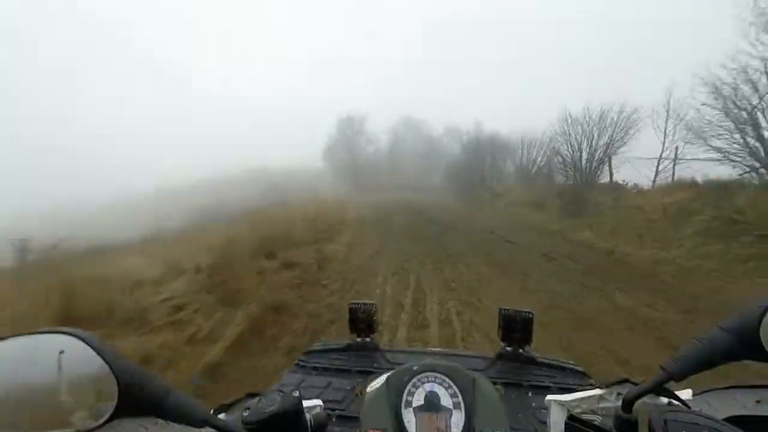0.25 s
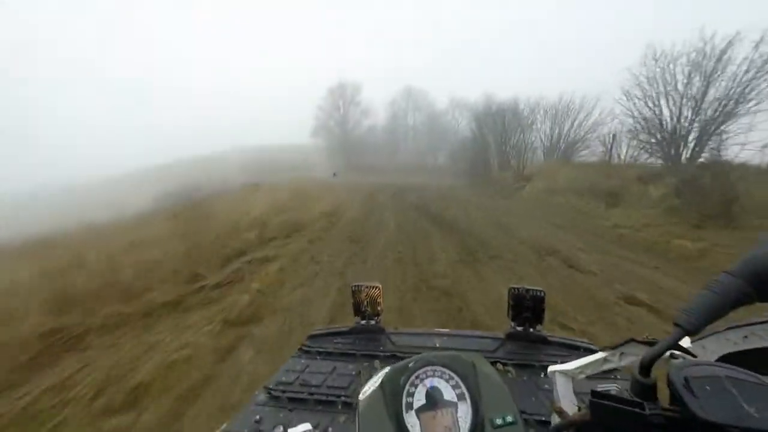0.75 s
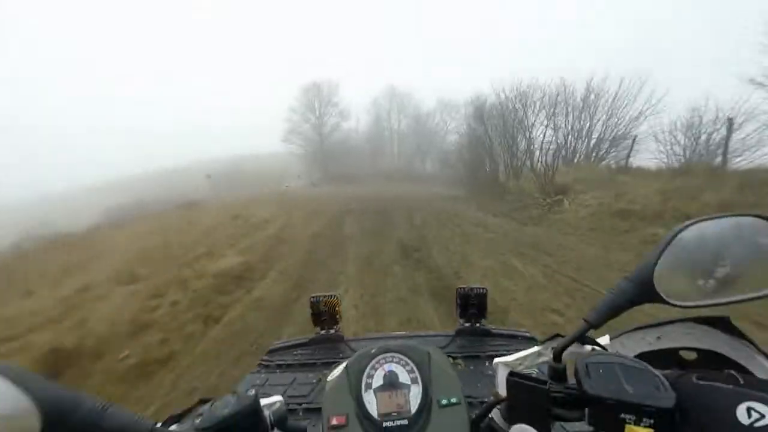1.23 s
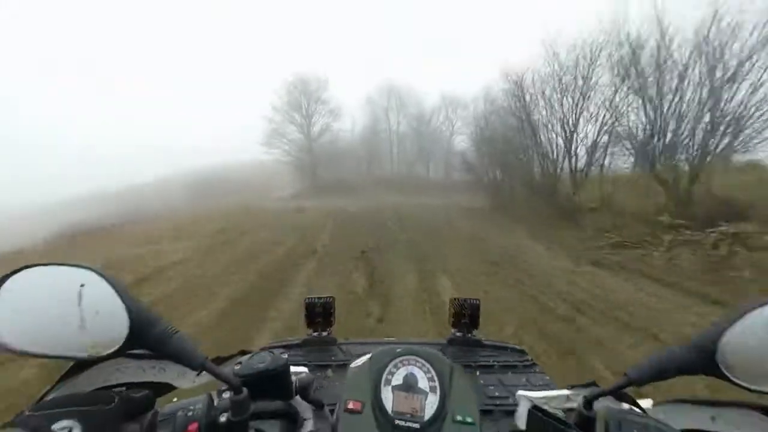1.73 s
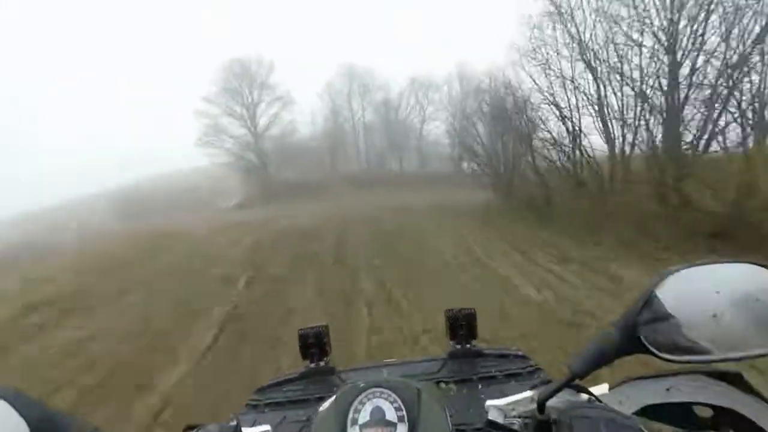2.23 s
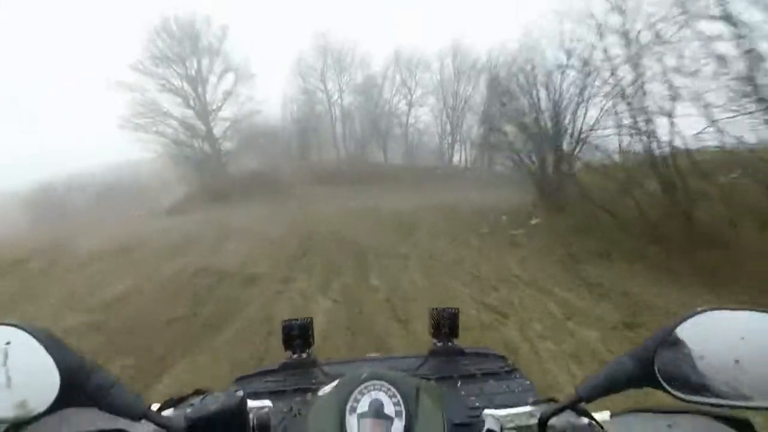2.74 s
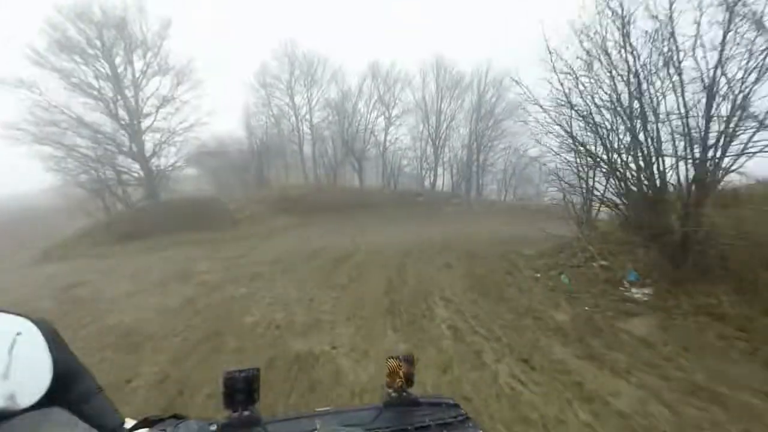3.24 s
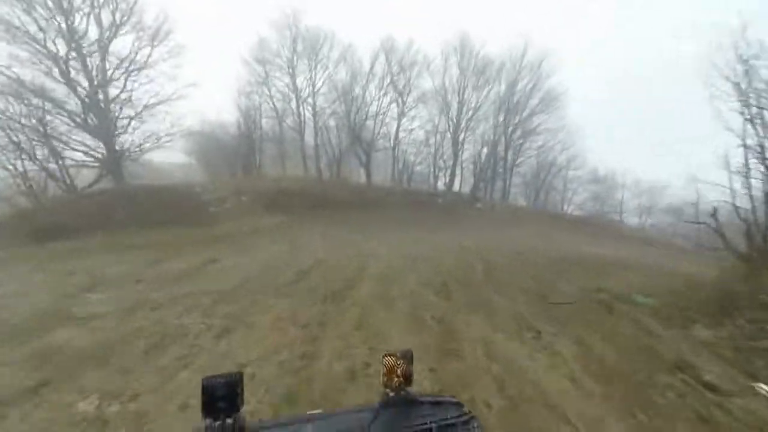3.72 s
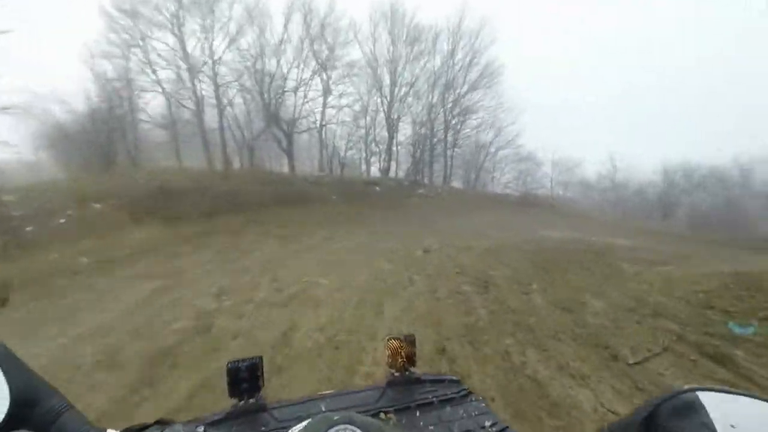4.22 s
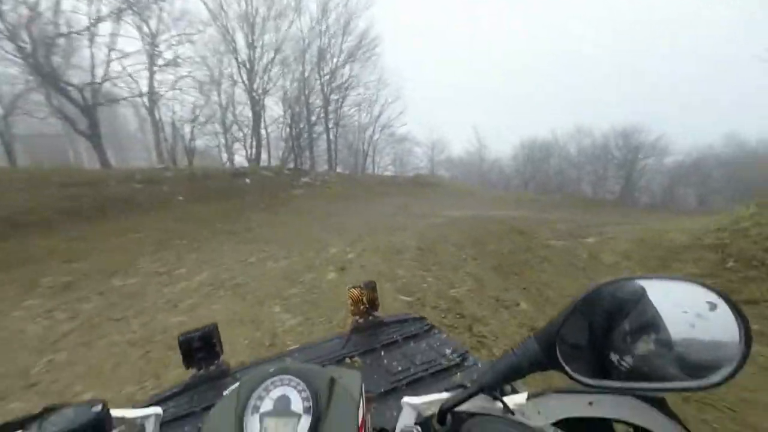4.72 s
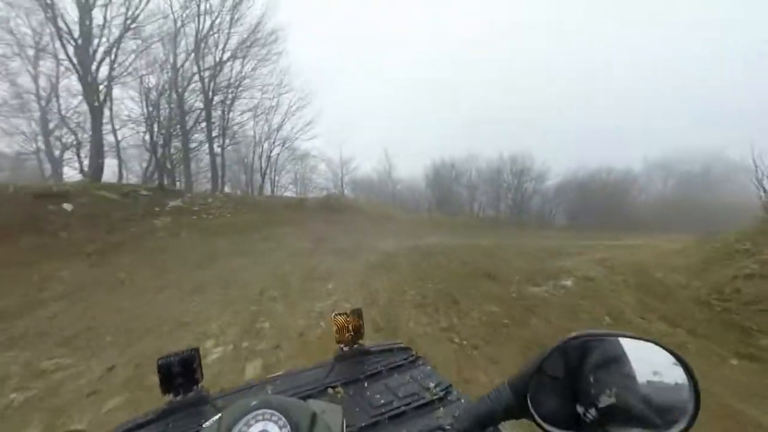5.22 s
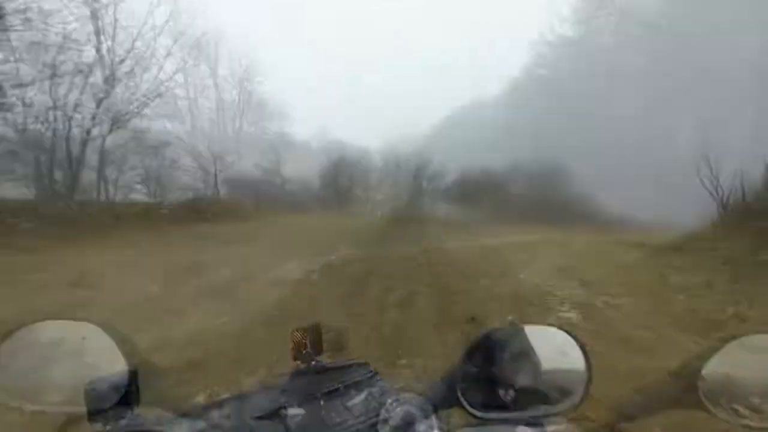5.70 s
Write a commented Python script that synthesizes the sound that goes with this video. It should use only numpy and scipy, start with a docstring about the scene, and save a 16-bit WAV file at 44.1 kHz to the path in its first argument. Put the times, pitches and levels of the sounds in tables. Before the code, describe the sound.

A quad bike engine drones at high revs on a muddy track, heard close from the rider's seat. The throttle shuts and the note sinks to a low, clattering putter as bumps thud and air buffets the microphone. Metal squeaks once and loose plastic bodywork knocks. The engine then picks up to moderate revs, with more knocks, ticking grit and a faint crunch of tyres.

```python
"""A quad bike's engine drives it up a muddy track, heard from the rider's seat.
Its firings make the exhaust drone and puff, while small metal parts clatter in the casing.
It holds about 6000 rpm, eases off, coasts over bumps and picks up again.
The bumps shake the air at the microphone and loose bodywork knocks and booms.
Grit ticks, the tyres crunch, gravel patters and dry metal squeaks once."""
import sys
import numpy as np
from scipy import signal
from scipy.fft import rfft, irfft
from scipy.io import wavfile
from scipy.ndimage import uniform_filter1d

SR = 44100
rng = np.random.default_rng(int(sys.argv[2]) if len(sys.argv) > 2 else 0)


def bounce(signal):
    """Save signal as a 16-bit WAV file at the path given by the first command-line argument."""
    frames = np.transpose(np.atleast_2d(signal))
    limited = np.clip(frames, -1, 1)
    pcm = np.round(limited * 32767).astype(np.int16)
    wavfile.write(sys.argv[1], SR, pcm)


N = 262836
T = np.arange(N) / SR

# engine cycles a second (one cycle is two turns of the crank): t/s, f/Hz
CYCLE_RATE = [(0, 50), (.5, 49), (1.1, 50.8), (1.3, 50), (1.38, 46), (1.5, 40.3), (1.6, 37), (1.76, 33.8),
              (1.99, 30.6), (2.27, 34.8), (2.4, 32), (2.7, 27.3), (3, 22.2), (3.2, 20), (3.58, 16.8),
              (4.14, 16.8), (4.56, 32.5), (4.68, 31.2), (4.83, 28.7), (5.04, 31.7), (5.38, 33.1),
              (5.5, 29.6), (5.96, 27.6)]
# how hard the engine works, given as the level of its clatter: t/s, level/dB
EFFORT = [(0, -23.5), (.2, -23), (1.26, -22), (1.41, -28.5), (1.64, -34), (2.36, -33.5), (2.8, -39),
          (3.5, -44), (4.22, -48), (4.46, -37.5), (4.78, -39), (4.95, -40.5), (5.35, -38.5), (5.96, -44.5)]


def exhaust(cycles, speed, waver_db=0.9, jitter_cycles=.007):
    """The engine note: tones at multiples of the cycle rate, each swelling at a pipe resonance."""
    # throttle: t/s, opening (0 shut, 1 wide open)
    openings = [(1.29, 1), (1.35, 0), (1.98, 0), (2.08, .5), (2.26, .5), (2.35, 0), (4.15, 0), (4.28, .5),
                (4.55, .5), (4.62, 0), (4.85, 0), (4.96, .5), (5.38, .5), (5.48, .25)]
    # tones: multiple of the cycle rate, level/dB with the throttle shut, half open, wide open
    harmonics = [(1, -33, -37, -38), (2, -34.5, -37, -33), (3, -28, -36.5, -38.5), (4, -31, -42, -36.5),
                 (5, -35.5, -45, -36), (6, -42, -39, -33), (7, -41, -31.5, -47), (8, -41, -36.5, -37.5),
                 (9, -40, -42, -40), (10, -44, -35.5, -44), (11, -46, -42, -47), (12, -49, -46, -37.5),
                 (16, -55, -50, -34)]
    # resonances of the silencer and airbox: f/Hz, gain/dB
    pipes = [(20, -24), (45, -12), (70, -8), (88, -1.5), (102, 0), (120, -2.5), (138, -5), (160, -8),
             (195, -4), (225, -1), (260, -5), (305, -4), (340, -7), (400, -14), (460, -11), (600, -15),
             (1000, -23)]
    # rise and fall of the whole note: t/s, gain/dB
    note_gain = [(0, -1.5), (.6, .5), (1.26, 0), (1.43, -4.5), (1.64, -7), (1.9, -4.5), (2.36, -9.5),
                 (2.6, -8.5), (2.85, -6), (3.2, -8.5), (3.5, -12.5), (4.15, -16), (4.35, -8.5),
                 (4.5, -10.5), (4.8, -11.5), (5, -10), (5.7, -10), (5.96, -14.5)]
    throttle, = in_time(openings)
    ragged_cycles = cycles + jitter_cycles * drift(33)   # no two firings are equal
    tone = 0
    for multiple, *levels in harmonics:
        db = np.interp(throttle, [0, .5, 1], levels) + at_hz(pipes, multiple * speed)
        db += waver_db * drift(5.1)
        phase = 2 * np.pi * (multiple * ragged_cycles + rng.random())
        tone += from_db(db) * np.sqrt(2) * np.sin(phase)
    uneven_db = (.6 + 1.1 * throttle) * drift(35)
    return from_db(in_time(note_gain)[0] + uneven_db) * tone


def firing(cycles, second_at, fade):
    """Two unevenly spaced power strokes a cycle; their spacing and fade are shares of a cycle."""
    return sum(np.exp(-((cycles - at) % 1) / fade) for at in (0, second_at))


def engine_load(firm_hz_per_s=19, lag_s=0.15):
    """Effort in dB relative to full, and how firmly the engine slows and speeds up (each 0 to 1)."""
    full_effort_db = -22
    change = np.gradient(in_time(CYCLE_RATE)[0]) * SR
    memory = np.exp(-1 / (lag_s * SR))
    trend = signal.lfilter([1 - memory], [1, -memory], np.tanh(change / firm_hz_per_s))
    return in_time(EFFORT)[0] - full_effort_db, np.maximum(-trend, 0), np.maximum(trend, 0)


def under_load(response, load):
    """The level in dB that a part reaches under the engine's load."""
    full_db, effort_share, slowing_db, speeding_db = response
    effort_db, slowing, speeding = load
    return full_db + effort_share * effort_db + slowing_db * slowing + speeding_db * speeding


def puffs(strokes, load):
    """Ragged gas leaves the silencer with each power stroke."""
    # tone colour of the gas: f/Hz, gain/dB
    spectrum = [(30, -33.5), (70, 4), (110, 1.5), (150, -3.5), (215, 1.5), (270, -3.5), (330, -7.5),
                (390, -14), (470, -9.5), (600, -17.5), (1000, -23), (5000, -94)]
    # level/dB at full effort, share of effort followed, gain/dB when slowing, when speeding up
    response = (-36, 0.54, 6, 5)
    gas = rng.standard_normal(N) * (0.19 + strokes)
    return from_db(under_load(response, load)) * rms_one(colour(gas, spectrum))


def clatter(cycles, speed, strokes, count=28, scatter_db=-2.0, slop_s=.00005, flutter_db=1.03):
    """Valves, chain and gear teeth strike at set points of each cycle, over a pulsing rasp."""
    # resonances of the engine casing: f/Hz, width/Hz, gain/dB
    casing = [(1382, 65, 7), (1678, 75, 6.5), (1873, 22, 7), (2025, 90, 5.5), (2200, 60, 2),
              (2507, 50, 4.5), (2620, 430, 11), (2738, 50, 5), (2830, 50, 4), (2930, 70, 5.5),
              (3158, 25, 5), (3520, 110, -3), (3690, 90, 4), (4355, 390, 8.5), (4970, 226, -9),
              (5600, 430, 8), (9520, 850, 6.5), (14100, 920, 5)]
    # tone colour at high revs: f/Hz, gain/dB
    fast_spectrum = [(200, -12), (400, -12), (800, -14.5), (1250, -17), (2000, -6.5), (3200, -10.5),
                     (4200, -16), (6500, -21.5), (8200, -33.5), (11000, -37), (15000, -48.5)]
    # tone colour at low revs: f/Hz, gain/dB
    slow_spectrum = [(200, -18), (400, 1), (800, -6), (1250, -7), (2000, 2), (3200, -7.5), (4200, -8),
                     (6500, -13.5), (8200, -24.5), (11000, -29), (15000, -40)]
    place, strength = rng.random(count), rng.standard_normal(count)
    strike_cycles = np.arange(240)[:, None] + (np.arange(count) + place) / count
    times = np.interp(strike_cycles, cycles, T, right=2 * T[-1])
    times += slop_s * rng.standard_normal(times.shape)
    scatter = from_db(scatter_db * rng.standard_normal(times.shape))
    sizes = np.sign(strength) * (1.6 + np.abs(strength)) * scatter
    strikes = rms_one(clicks(times, sizes) / np.sqrt(speed))
    rasp = rms_one(rng.standard_normal(N) * (1.7 + strokes))
    drive = (strikes + rasp) * from_db(flutter_db * drift(45))
    racing = np.clip((speed - 35) / 13, 0, 1)   # at high revs the clatter takes on a different tone colour
    fast = rms_one(colour(drive, fast_spectrum, casing))
    slow = rms_one(colour(drive, slow_spectrum, casing))
    return from_db(in_time(EFFORT)[0]) * (racing * fast + (1 - racing) * slow)


def cover(cycles, strokes, load, scuff_cycles=0.36):
    """The power strokes set a thin cover ringing, and once a cycle it scuffs on its mounts."""
    # the cover's short, rattling tones: f/Hz, level/dB, t60/s
    rattle_tones = [(2090, -8.5, 0.015), (2426, 4.5, 0.021), (2745, 3.5, 0.015), (3270, 1.5, 0.0054),
                    (5480, -5.5, 0.013)]
    # its longer, ringing tones: f/Hz, level/dB, t60/s
    ring_tones = [(2025, -3.5, .08), (2512, 1.5, .08), (2620, 1, .07), (2800, -3, .06), (4170, 2.5, .055),
                  (4300, 1, .045), (5600, -8, .015)]
    # rattle: level/dB at full effort, share of effort followed, gain/dB when slowing, when speeding up
    rattle_response = (-50, 0, -2, -4)
    # ringing: the same four values
    ring_response = (-43.7, 0.5, -3.5, 6)
    # brief fits of louder rattling: t/s, length/s, level/dB
    fits = [(2.114, 0.17, -38.5), (3.203, 0.12, -43.5), (3.724, 0.036, -40), (4.404, 0.2, -40.5),
            (4.866, 0.27, -40)]
    scuffs = 0.52 + np.exp(-(cycles % 1) / scuff_cycles)
    rattle = sum(from_db(db) * ring(scuffs * rng.standard_normal(N), hz, t60)
                 for hz, db, t60 in rattle_tones)
    ringing = sum(from_db(db) * rms_one(ring(rng.standard_normal(N) * (0.2 + strokes), hz, t60))
                  for hz, db, t60 in ring_tones)
    flares = swells(fits, attack_s=0.019, t60=0.16)
    rattle_gain = np.hypot(from_db(under_load(rattle_response, load)), flares)
    return from_db(under_load(ring_response, load)) * rms_one(ringing) + rattle_gain * rms_one(rattle)


def shaking(even_s=0.058, bounce_hz=37):
    """Air buffets the microphone, and each bump sets the machine bouncing with a deep tone."""
    # tone colour of the buffeting: f/Hz, gain/dB
    spectrum = [(8, -6), (18, -11.5), (28, -7), (39, -3), (50, -29), (65, -16.5), (100, -37), (250, -88),
                (2000, -110)]
    # strength of the buffeting: t/s, level/dB
    levels = [(0, -36), (1.1, -40), (2.1, -32), (2.9, -39), (4.1, -39), (4.8, -40.5), (5.2, -35),
              (5.45, -40), (5.96, -46)]
    # bumps in the track: t/s, level/dB
    bumps = [(0, -31), (1.31, -31), (1.45, -28), (1.79, -28), (2.0, -26), (2.41, -21.5), (2.58, -27.5),
             (2.99, -24.5), (3.21, -26.5), (3.39, -26.5), (3.645, -29.5), (3.9, -27.5), (4.3, -33.5),
             (4.54, -36), (4.96, -36)]
    buffet = colour(rng.standard_normal(N), spectrum)
    power = uniform_filter1d(buffet ** 2, int(even_s * SR) + 1)
    buffet /= np.sqrt(power + 1e-12)   # even out its loudness
    buffet *= from_db(in_time(levels)[0] + drift(8.4))
    jolts = sum(from_db(db) * swell(start, length_s=0.05, attack_s=0.023, t60=0.28)
                for start, db in bumps)
    return buffet + jolts * wavering(bounce_hz, wander_hz=9, rate=29)


def bodywork(crack_db=8.5, crack_t60=0.012, soft_hz=1300):
    """A loose panel knocks: a hollow ring whose pitch depends on the spot, and a crack if hit hard."""
    # knocks: t/s, level/dB, pitch/Hz, hardness/dB (gain of the crack)
    knocks = [(2.976, -26, 740, -26), (2.993, -33, 770, -24), (3.002, -28, 720, -26),
              (3.014, -33, 686, -24), (3.025, -35, 724, -24), (3.03, -33.5, 764, -20),
              (3.219, -49, 764, 16), (3.596, -36, 520, -4), (3.893, -30, 764, -8), (4.579, -27, 727, -11),
              (4.729, -26.5, 766, -15), (5.028, -31, 727, -22), (5.347, -32, 733, -17),
              (5.43, -38.5, 725, -15), (5.498, -38, 764, -14), (5.594, -27, 750, -13),
              (5.599, -38, 780, -18), (5.614, -32, 745, 6.5), (5.822, -39.5, 790, 2), (5.887, -43, 885, 7)]
    # tones of the hollow plastic panel: multiple of the pitch, gain/dB, t60/s
    panel = [(.31, -6, 0.047), (.42, -7.5, 0.044), (.89, -42, 0.011), (1, 2, 0.039), (1.27, -7, 0.022),
             (1.9, -8, 0.042)]
    # tone colour of the crack: f/Hz, gain/dB
    crack_spectrum = [(400, -28), (1000, -2), (1900, 3), (2900, 8.5), (3500, -22), (9000, -45),
                      (16000, -65)]
    blow = signal.unit_impulse(SR // 8)
    hollow, cracks = 0, 0
    for start, db, hz, hard_db in knocks:
        knock = sum(from_db(db + tone_db + rng.normal(0, 1)) * ring(blow, ratio * hz, t60)
                    for ratio, tone_db, t60 in panel)
        hollow += np.pad(knock, (int(start * SR), N))[:N]
        cracks += from_db(db + hard_db) * burst(start, crack_t60)
    hollow = signal.sosfilt(signal.butter(2, soft_hz, fs=SR, output="sos"), hollow)
    return hollow + from_db(crack_db) * colour(cracks, crack_spectrum)


def drumming():
    """A large shaken panel booms for a moment."""
    # booms: t/s, length/s, level/dB, f/Hz
    booms = [(1.599, 0.043, -31, 203.8), (1.797, 0.15, -40, 204.3), (2.099, 0.061, -33.5, 196),
             (2.995, 0.027, -44, 295.4), (2.998, 0.04, -37, 212), (3.875, 0.018, -36, 210)]
    return sum(from_db(db) * swell(start, length, attack_s=0.016, t60=0.16)
               * wavering(hz, wander_hz=24, rate=93.4) for start, length, db, hz in booms)


def grit(contact_t60=0.01, snap=0.076, spray_db=-45.0, per_s=14, speck_s=0.00049):
    """Small stones snap and ring against metal, among a thin spray of finer ones."""
    # stone hits: t/s, level/dB, f/Hz, t60/s
    hits = [(0.9265, -16, 9400, 0.0042), (1.576, -26.5, 6800, 0.0011), (1.935, -24.5, 9850, 0.0011),
            (2.03, -36, 8500, .002), (2.453, -39, 10500, .001), (2.709, -35, 9500, 0.0013),
            (2.821, -42, 10000, .001), (3.2202, -28, 5500, 0.0039), (3.226, -37, 5600, .008),
            (3.313, -42, 10500, .001), (3.326, -35, 5840, .004), (3.677, -41, 9000, .0006),
            (3.796, -42, 10000, .001), (3.813, -45, 9000, .001), (4.25, -34.5, 4280, 0.0037),
            (4.485, -44, 9500, .001), (4.577, -32, 5600, .004), (4.986, -40, 10500, .001),
            (5.2598, -38, 7940, .002), (5.27, -44, 13000, .001), (5.318, -39, 10500, .0015),
            (5.474, -38, 7300, .002), (5.54, -28, 4006, 0.0016), (5.772, -29.5, 3993, 0.0029)]
    # tone colour of the ticks at the microphone: f/Hz, gain/dB
    spectrum = [(500, -10), (3000, 2.5), (9000, -1), (16000, -27)]
    stones = 0
    for start, db, hz, t60 in hits:
        contact = burst(start, contact_t60)
        tick = ring(contact, hz, t60)
        stones += from_db(db) * (tick / np.abs(tick).max() + snap * contact / np.abs(contact).max())
    specks = (rng.random(N) < per_s / SR) * rng.random(N)
    fades = signal.lfilter([1], [1, -np.exp(-1 / (speck_s * SR))], specks + 1e-18)
    spray = fades * rng.standard_normal(N)
    return colour(stones + from_db(spray_db) * spray, spectrum)


def squeak(hz=5580, wander_hz=60, octave_db=-28, rasp_db=3.5):
    """Dry metal sticks and slips raggedly: a high tone with a weak one an octave above."""
    # quick slips: t/s, length/s, level/dB
    slips = [(2.729, 0.032, -32), (2.77, 0.014, -35), (2.779, 0.005, -28.5), (2.802, 0.017, -42)]
    phase = 2 * np.pi * np.cumsum(hz + wander_hz * drift(300)) / SR
    loudness = swells(slips, attack_s=0.0041, t60=0.029) * from_db(rasp_db * drift(200))
    return loudness * (np.sin(phase) + from_db(octave_db) * np.sin(2 * phase))


def whine():
    """While the bike coasts, loose metal rubs and rings with thin, wavering tones."""
    # rubs: t/s, length/s, level/dB, f/Hz, t60/s of the ring
    rubs = [(1.378, 0.41, -47.5, 1393, 0.033), (1.77, 0.067, -41, 1410, 0.08),
            (1.865, 0.22, -49, 1410, 0.067), (2.308, 0.06, -38.5, 1970, 0.013),
            (2.586, 0.088, -41, 1750, .007), (3.363, 0.035, -47.5, 1730, 0.011)]
    rubbing = rng.standard_normal(N)
    return sum(from_db(db) * swell(start, length, attack_s=0.025, t60=0.24)
               * rms_one(ring(rubbing, hz, t60)) for start, length, db, hz, t60 in rubs)


def tyres(level_db=-53.5, per_s=900):
    """Knobbly tyres crunch through wet dirt, one tiny click for each grain."""
    # tone colour of the crunch: f/Hz, gain/dB
    spectrum = [(100, -1.0), (500, -4), (1200, 0.5), (3500, -13.0), (7000, -12.5), (15000, -69)]
    grains = (rng.random(N) < per_s / SR) * rng.standard_normal(N) * grain_sizes(spread_db=1.5)
    return from_db(level_db) * rms_one(colour(grains, spectrum))


def gravel(trickle_db=-68.0, per_s=900):
    """Fine gravel patters on the mudguards: a steady trickle that swells into showers."""
    # showers thrown up by the tyres: t/s, length/s, level/dB
    showers = [(2.333, 0.31, -55.5), (3.21, 0.12, -64.5), (3.66, 0.18, -66), (3.91, 0.028, -60),
               (4.516, 0.063, -55.5), (5.248, .025, -49)]
    # tone colour of the patter: f/Hz, gain/dB
    spectrum = [(1500, -12), (4000, -5), (6200, 0), (8200, -9), (11000, -11), (15000, -24)]
    grains = (rng.random(N) < per_s / SR) * rng.choice([-1, 1], N) * grain_sizes(spread_db=2.5)
    loudness = from_db(trickle_db) + swells(showers, attack_s=.012, t60=.09)
    return loudness * rms_one(colour(grains, spectrum))


def grain_sizes(spread_db):
    """Random gains: many small grains and a few big ones."""
    return from_db(spread_db * np.minimum(rng.exponential(1, N), 4))


def from_db(db):
    """Turn decibels into a factor to multiply by."""
    return np.exp(np.asarray(db) * (np.log(10) / 20))


def rms_one(x):
    """Scale a sound so that its average strength (rms) is 1."""
    return x / np.sqrt(np.mean(x ** 2) + 1e-20)


def in_time(rows):
    """Join a table's points with straight lines, giving each column at every sample."""
    times, *columns = np.transpose(rows)
    return [np.interp(T, times, column) for column in columns]


def at_hz(points, hz):
    """Read a spectrum's gain in dB at a frequency, on a logarithmic frequency scale."""
    f, db = np.transpose(points)
    return np.interp(np.log(hz + 1e-3), np.log(f), db)


def colour(x, spectrum, resonances=(), size=16384):
    """Filter a sound with a broad tone colour and narrow resonances on top."""
    hz = np.arange(size // 2 + 1) * SR / size
    peaks_db = sum(db / (1 + (2 * (hz - f) / width) ** 2) for f, width, db in resonances)
    gain = from_db(at_hz(spectrum, hz) + peaks_db)
    # minimum phase: the filter rings only after a click, never before it
    cepstrum = irfft(np.log(gain))[:size // 2]
    cepstrum[1:] *= 2
    click_response = irfft(np.exp(rfft(cepstrum, size)))[:size // 2]
    return signal.fftconvolve(x, click_response)[:N]


def drift(rate):
    """A smooth random wobble of typical size 1, changing about rate times a second."""
    r = np.exp(-80 * np.pi * rate / SR)
    slow = signal.lfilter([1], [1, -2 * r, r * r], rng.standard_normal(N // 40 + 2002))[2000:]
    return np.interp(np.arange(N) / 40, np.arange(len(slow)), rms_one(slow))


def wavering(hz, wander_hz, rate):
    """A tone of rms 1 whose pitch wanders."""
    return np.sqrt(2) * np.sin(2 * np.pi * np.cumsum(hz + wander_hz * drift(rate)) / SR)


def ring(x, hz, t60):
    """One resonance: each click starts a tone that fades by 60 dB in t60 seconds."""
    r, w = from_db(-60 / (t60 * SR)), 2 * np.pi * hz / SR
    return signal.lfilter([0, np.sin(w)], [1, -2 * r * np.cos(w), r * r], x + 1e-18)


def clicks(times, sizes):
    """Blows one sample long at the given times."""
    samples = np.clip(np.ravel(times) * SR, 0, N).astype(int)
    return np.bincount(samples, np.ravel(sizes), N + 1)[:N]


def burst(start, t60):
    """Noise that starts at once and dies away."""
    age = np.arange(SR // 20) / SR
    puff = rng.standard_normal(len(age)) * from_db(-60 * age / t60)
    return np.pad(puff, (max(int(start * SR), 0), N))[:N]


def swell(start, length_s, attack_s, t60):
    """A loudness curve that rises, holds until its length is over, then dies away."""
    age = T - start
    return np.clip(age / attack_s, 0, 1) * from_db(-60 * np.clip((age - length_s) / t60, 0, 3))


def swells(rows, attack_s, t60):
    """Add up one swell for each row of t/s, length/s, level/dB."""
    return sum(from_db(db) * swell(start, length, attack_s, t60) for start, length, db in rows)


def scene():
    """One crank times the exhaust, clatter and cover; the ride over the track adds the rest."""
    speed = in_time(CYCLE_RATE)[0] * (1 + .0015 * drift(12))
    cycles = np.cumsum(speed) / SR
    strokes = firing(cycles, second_at=.42, fade=0.1)
    load = engine_load()
    gas = exhaust(cycles, speed) + puffs(strokes, load)
    metal = clatter(cycles, speed, strokes) + cover(cycles, strokes, load) + whine()
    ride = shaking() + tyres() + bodywork() + drumming() + grit() + gravel() + squeak()
    return (gas + metal + ride)[None]


def record(dry, cutoff_hz=15600):
    """A steep filter cuts off the highest treble."""
    return signal.sosfilt(signal.ellip(10, .2, 80, cutoff_hz, fs=SR, output="sos"), dry)


dry = scene()
out = record(dry)
bounce(out)
```